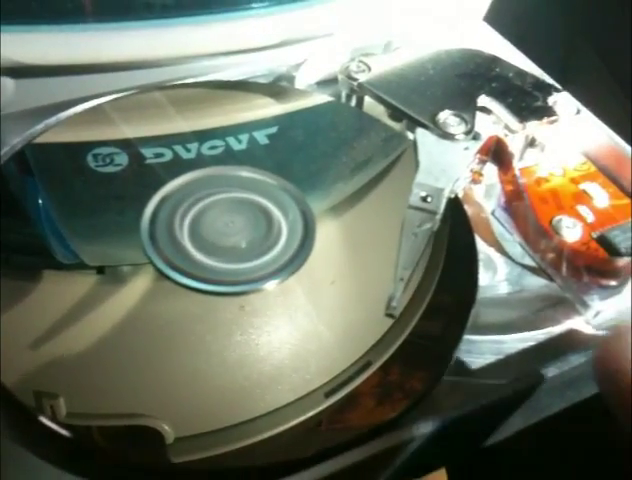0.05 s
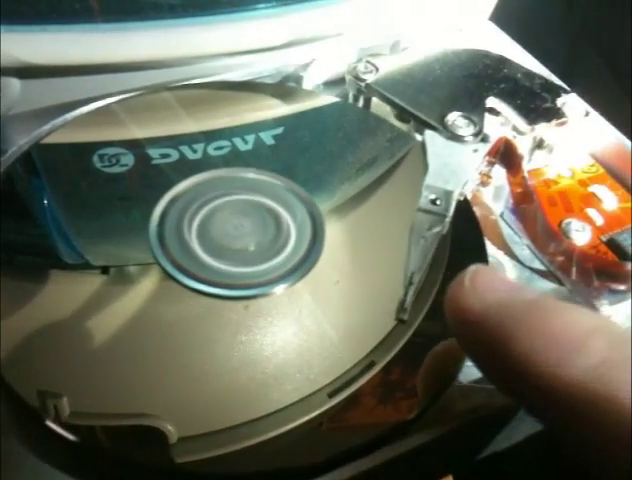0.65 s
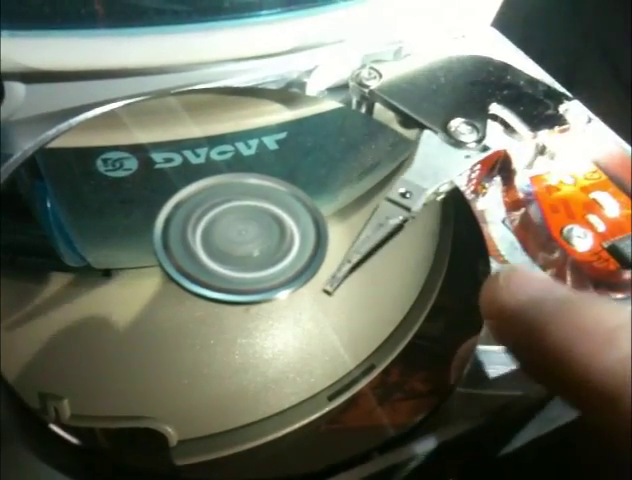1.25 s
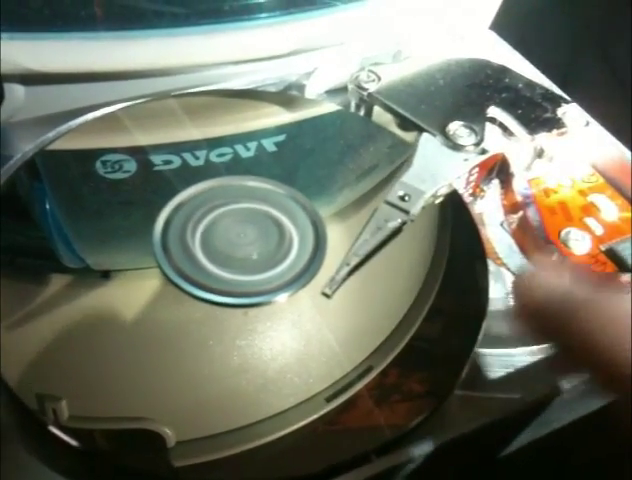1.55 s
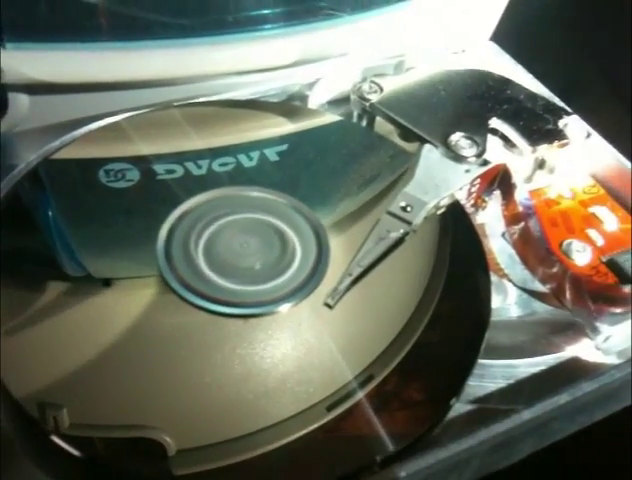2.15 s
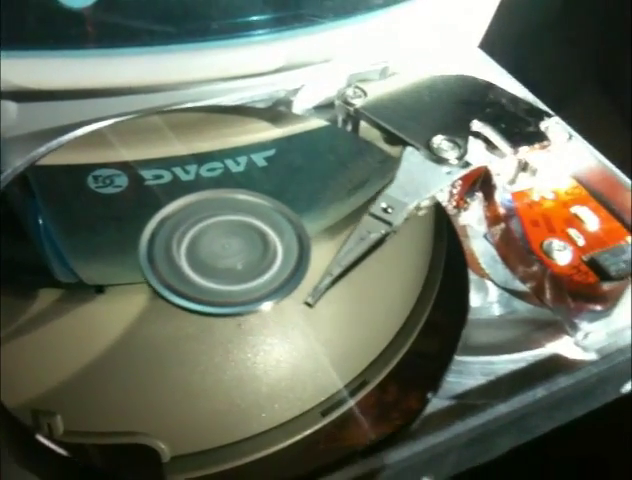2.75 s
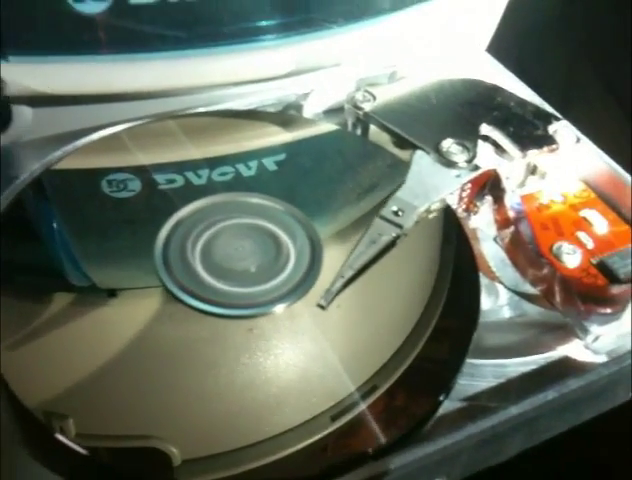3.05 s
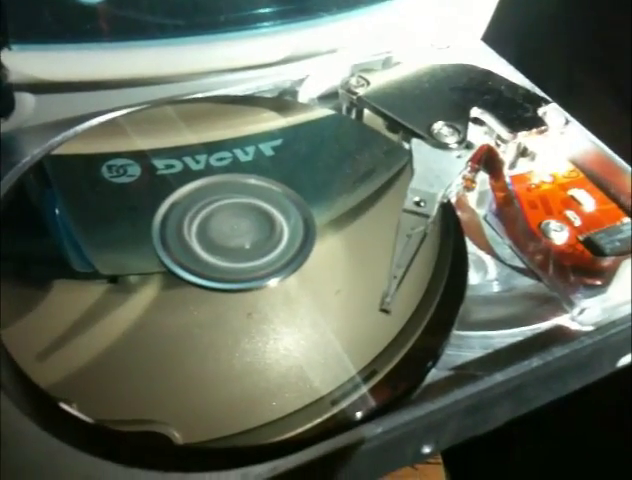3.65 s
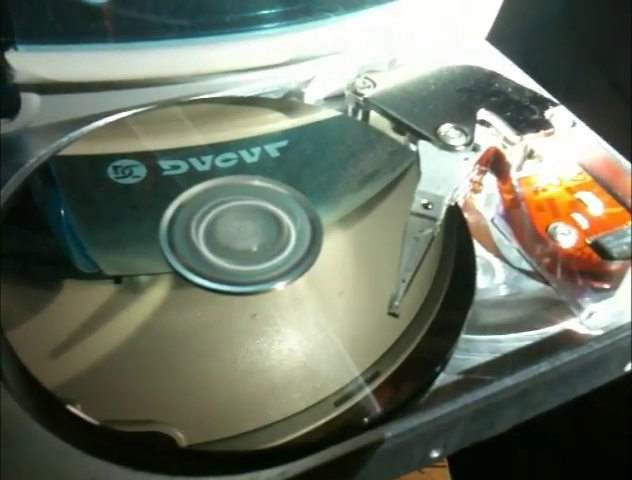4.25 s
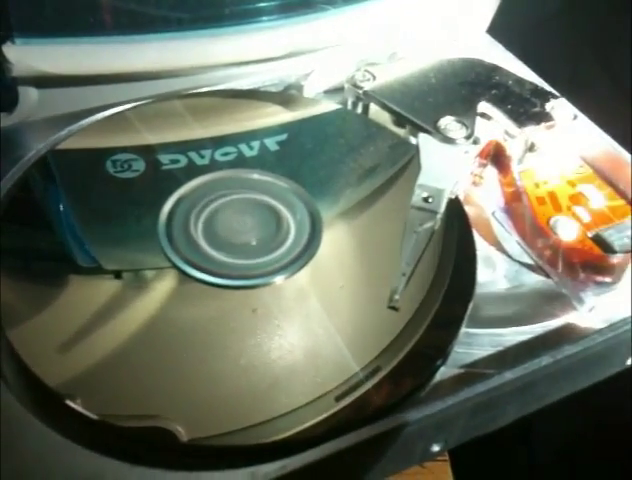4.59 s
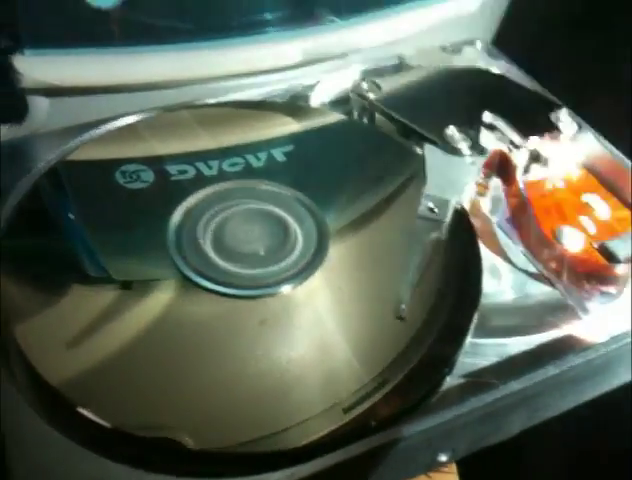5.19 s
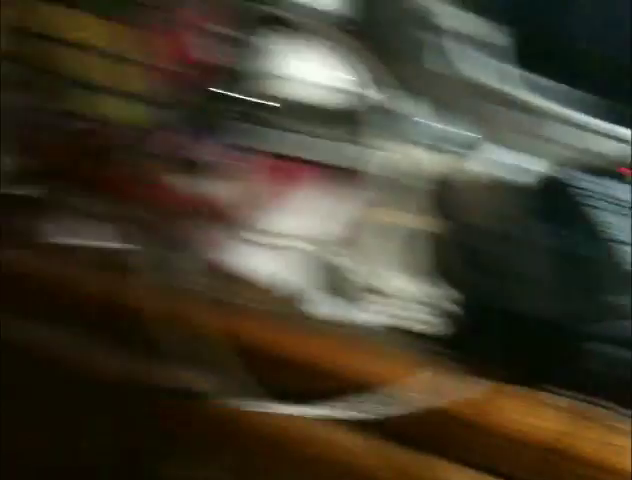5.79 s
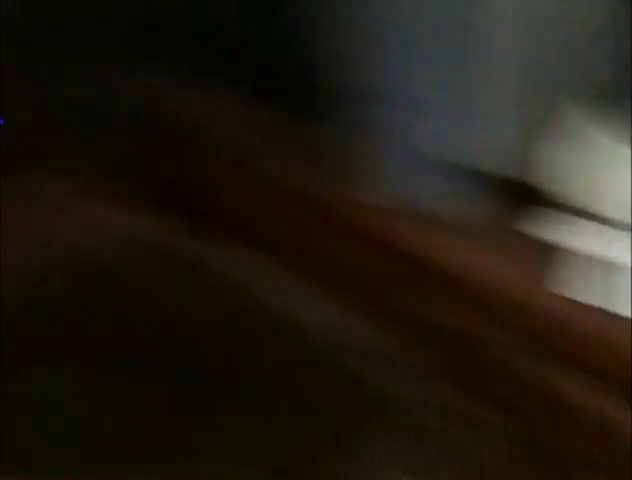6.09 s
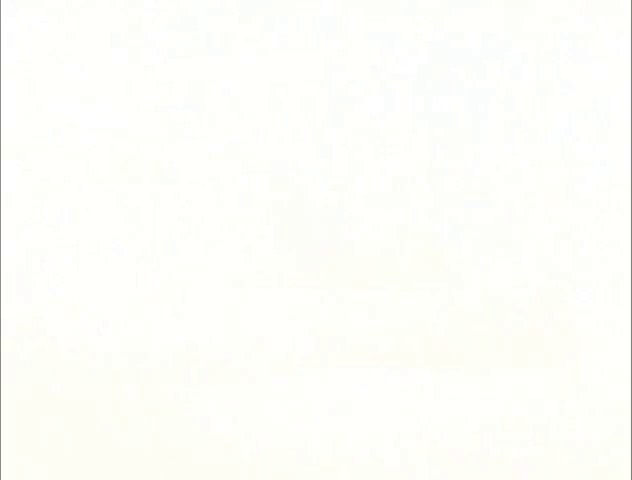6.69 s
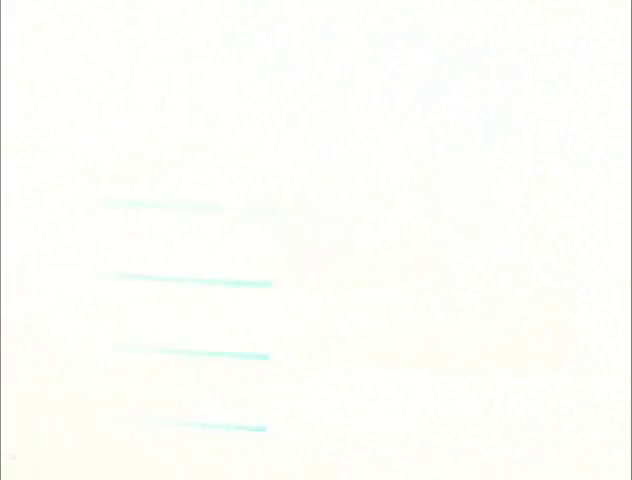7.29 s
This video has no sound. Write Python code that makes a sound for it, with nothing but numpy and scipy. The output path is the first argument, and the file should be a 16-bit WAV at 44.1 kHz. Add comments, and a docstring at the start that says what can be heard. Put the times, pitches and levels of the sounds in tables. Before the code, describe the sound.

In a furnished room with a low hum, a close hard drive gives off a high motor whine. Its arm clicks sharply and the head skids for an instant; the whine drops away twice, then steadies. A few more clicks follow, then soft uneven ticking. Near the end come light knocks and faint handling rubs as the microphone moves away and the drive grows quieter.

```python
"""A desk in a furnished room, microphone 14 cm from an open hard drive. A low hum sounds, a picture tube
whistles faintly, the motor whines and the bearings sing. From 0.8 s the speed hunts. At 1.2 s a finger
flicks the head arm against its stop and the head skids; the drive current then cuts out twice while the
bearings sing on. At 3.2 s the arm knocks back and goes on ticking. From about 5 s the hand rubs the
microphone and, over a few last knocks, carries it some 70 cm further off into the room's hum."""
import sys
import numpy as np
from scipy import signal
from scipy.fft import rfft, irfft, next_fast_len
from scipy.io import wavfile
from scipy.ndimage import uniform_filter1d, map_coordinates

SR = 44100
rng = np.random.default_rng(int(sys.argv[2]) if len(sys.argv) > 2 else 0)


def transcribe(signal):
    """Save signal, clipped to [-1, 1], as a 16-bit WAV file at the path in sys.argv[1]."""
    frames = np.atleast_2d(signal).T
    limited = np.clip(frames, -1, 1)
    pcm = np.round(limited * 32767).astype(np.int16)
    wavfile.write(sys.argv[1], SR, pcm)


N = 323249
TIME = np.arange(N) / SR


def amp(db):
    """Decibels to gain."""
    return 10 ** (np.asarray(db) / 20)


def unit(x):
    """Scale to rms 1."""
    return x / np.sqrt(np.mean(x ** 2) + 1e-20)


def curves(rows):
    """One value per sample for each column after the time."""
    times, *columns = np.transpose(rows)
    return [np.interp(TIME, times, column) for column in columns]


def wobble(rate_hz, size=64):
    """A smooth random curve, rate_hz knots a second, drawn in straight steps of size samples."""
    steps = np.arange(0, N + size, size)
    path = map_coordinates(rng.standard_normal(4096), [steps * rate_hz / SR], mode="wrap")
    return np.interp(np.arange(N), steps, path)


def coloured(x, spectrum):
    """x shaped by (frequency_hz, gain_db) points, at rms 1."""
    size = next_fast_len(N + 8192)
    hz, db = np.transpose(spectrum)
    gain = amp(np.interp(np.log(np.fft.rfftfreq(size, 1 / SR) + 1), np.log(hz), db))
    return unit(irfft(rfft(x, size) * gain, size)[:N])


def noise(spectrum):
    """Coloured noise of rms 1."""
    return coloured(rng.standard_normal(N), spectrum)


def tone(cycles, scatter=None, rate_hz=8):
    """A sine of rms about 1; a share of it, scatter, drifts in strength and phase."""
    angle = 2 * np.pi * (cycles % 1 + rng.random())
    if scatter is None:
        return np.sqrt(2) * np.sin(angle)
    steady = np.sqrt(2 * np.clip(1 - scatter ** 2, 0, 1))
    in_phase = steady + scatter * wobble(rate_hz)
    return in_phase * np.sin(angle) + scatter * wobble(rate_hz) * np.cos(angle)


def each_turn(turns, size=700):
    """A rough pattern that comes round again with every turn of the shaft."""
    return map_coordinates(rng.standard_normal(size), [turns % 1 * size], mode="grid-wrap")


def ringing(modes, t):
    """Struck modes dying away, at new strengths for every blow."""
    return sum(amp(db + rng.normal(0, 1.5) - 60 * t / t60) * np.sin(2 * np.pi * (hz * t + rng.random()))
               for hz, db, t60 in modes)


# Room rumble at the desk, the same away from it, and airy hiss: frequency_hz, density_db
DESK_RUMBLE = [(30, -38), (68, -32), (79, -29), (95, -38), (116, -6), (146, -9), (170, -3.5), (255, -0.5),
               (299, -0.5), (335, -8.5), (700, -10), (800, -13.5), (1200, -13), (1620, -18), (1900, -16),
               (2100, -21.5), (2500, -19), (3500, -61)]
FAR_RUMBLE = [(59, -49), (100, -20), (150, -6.5), (167, -3), (243, 0), (271, -8), (302, -0.5), (411, -11.5),
              (531, -7.5), (568, -10.5), (705, -10), (1460, -17.5), (2500, -21.5), (3250, -48),
              (5500, -120)]
AIR_HISS = [(1000, -2), (2500, 8.5), (5000, 8.5), (8500, 3), (10000, 3.5), (12000, -3), (13900, 3.5),
            (14700, -9)]
# Steady low hum tones near multiples of 59 Hz: pitch_hz, desk_level_db, far_level_db
LOW_HUM = [(58.7, -61.5, -64.5), (118.5, -63, -66), (178, -60, -58), (238, -72, -58.5), (300, -71.5, -55.5),
           (356.5, -72, -59), (906, -65, -69)]


def room_tone():
    """Rumble, hiss, hum and a picture tube's line whistle, heard at the desk, then away from it."""
    away, = curves([(5.4, 0), (6.2, 0.97)])

    def level(desk_db, far_db):
        return amp(desk_db + (far_db - desk_db) * away)

    rumble = np.sqrt(1 - away) * noise(DESK_RUMBLE) + np.sqrt(away) * noise(FAR_RUMBLE)
    hiss = level(-54, -55) * noise(AIR_HISS)
    hum = sum(level(desk_db, far_db) * tone(hz * TIME) for hz, desk_db, far_db in LOW_HUM)
    whistle = level(-58.5, -56.5) * tone(15734 * TIME, scatter=.45 + .3 * away, rate_hz=18)
    return level(-47.5, -46.5) * rumble + hiss + hum + whistle


SET_SPEED_HZ = 59.144
# The speed control overshoots, driving and coasting by turns: time_s, speed_error_hz
SPEED_HUNT = [(.84, 0), (.97, -.32), (1.44, 2.23), (2.252, -1.56), (2.705, .93), (2.975, -.38), (3.1, .07),
              (3.17, 0)]


def spindle():
    """Turns a second off the set speed, and the drive current (0-1), zero while the platter coasts."""
    switch_s, drag_hz_per_s, full_push_hz_per_s = .15, 4.4, 3.5
    error_hz = uniform_filter1d(curves(SPEED_HUNT)[0], round(switch_s * SR), mode="nearest")
    push = np.gradient(error_hz) * SR + drag_hz_per_s
    return error_hz, np.clip(push / full_push_hz_per_s, 0, 1)


# Base levels of the whine's three voices at the microphone: time_s, chord_db, middle_db, upper_db
WHINE_LEVELS = [(0.03, -39.5, -38.5, -46), (0.4, -39.5, -43.5, -41), (1.2, -39.5, -46, -47),
                (3.1, -39.5, -38.5, -46), (4, -40.5, -43, -47), (5.1, -39.5, -41, -55),
                (5.5, -41, -42.5, -36.5), (5.68, -41.5, -46, -46.5), (5.9, -38, -35.5, -35.5),
                (6.25, -40.5, -46, -44), (6.7, -45.5, -45.5, -53), (7.3, -49, -45, -43.5)]
# Resonances the voices cross as the speed changes: speed_error_hz, chord_db, middle_db, upper_db
WHINE_RESONANCES = [(-1.2, -9, -2, 7.5), (-0.93, -3, -7, 3), (-0.37, 5, 4.5, -5), (-0.19, 0.5, 6.5, 3),
                    (0.0069, 0, 0, -0.5), (0.23, -7.5, -5.5, -10), (0.69, 1.5, -6, -4), (1.3, -4, -10, -17),
                    (2.09, 0.5, -9, -6)]
# Close motor tones that beat once a turn: shaft_order, relative_db
CHORD = [(112, 0), (113, 0), (114, -16), (115, -9), (116, -12)]
# Weaker motor tones around them: shaft_order, base_level_db
SIDEBANDS = [(96, -60.6), (97, -71.1), (101, -64.1), (102, -65.3), (103, -53.5), (104, -59.0), (108, -68.7),
             (109, -67.3), (110, -62.7), (111, -61.8), (117, -65.0), (118, -62.6), (119, -67.5),
             (120, -61.6), (122, -63.8), (123, -59.3), (125, -64.1), (126, -69.4), (127, -69.4),
             (129, -61.6), (136, -66.4), (144, -68.3), (146, -70.3), (147, -65.0), (148, -71.3),
             (152, -70.7)]


def motor(turns, error_hz, current, retreat_m):
    """Switched coil current rings the motor at whole multiples of the shaft speed."""
    chord_db, middle_db, upper_db = curves(WHINE_LEVELS)
    errors, *gains = np.transpose(WHINE_RESONANCES)
    chord_boost, middle_boost, upper_boost = [np.interp(error_hz, errors, db) for db in gains]
    distance_db = -12 * retreat_m
    low_gain = amp(distance_db - 3 * np.abs(error_hz))  # low sidebands fade off the set speed
    high_gain = amp(distance_db + 0.98 * np.maximum(upper_boost, 0))
    # each tone flutters once the microphone moves through the room's standing waves
    flutter, = curves([(5.2, 0.079), (5.7, 0.68)])

    def partial(order, depth=1):
        return tone(order * turns, depth * flutter, rate_hz=15)

    def hub_db(order):  # overspeed carries a tone into the hub's resonance
        return 11 / (1 + ((order * (SET_SPEED_HZ + error_hz) - 7080) / 70) ** 2)

    chord = unit(sum(amp(db + hub_db(order)) * partial(order, depth=0.74) for order, db in CHORD))
    whine = amp(chord_db + chord_boost) * chord
    whine += amp(middle_db + middle_boost) * partial(124)
    whine += amp(upper_db + upper_boost) * partial(128)
    sidebands = sum(amp(db) * (low_gain if order < CHORD[0][0] else high_gain) * partial(order)
                    for order, db in SIDEBANDS)
    # the switching edges add a faint buzz on all the orders around
    buzz_spectrum = [(4000, -65), (5500, -2), (9000, 4), (9400, -17), (12700, -10), (14000, -38)]
    buzz = amp(-57.5) * high_gain * coloured(each_turn(turns), buzz_spectrum)
    drive = np.maximum(current ** 1.24, amp(-30))  # a trace of whine stays while coasting
    return drive * (whine + sidebands + buzz) * (1 + 0.098 * wobble(260))


# Ball-bearing tones at the set speed: pitch_hz, relative_db
BALL_TONES = [(2724, -52), (2826, -63), (2885, -62), (2968, -50), (3010, -59), (3078, -62), (3140, -54),
              (3213, -58), (3253, -63), (3465, -67), (3666, -68), (4258, -63), (4334, -61), (4398, -67),
              (4910, -68), (5372, -68), (5487, -72)]
# How well the casting radiates them: frequency_hz, gain_db
RADIATION = [(2630, -26), (2720, 1), (2900, 3.5), (3150, 1.5), (3500, 6), (4150, -7.5), (4330, 4),
             (4600, -0.5), (5400, 6)]
# Rolling noise through the casting: frequency_hz, density_db
ROLLING_NOISE = [(1500, -35), (2600, -19), (2760, 2.5), (3050, 0.5), (3350, -4), (3800, -10.5),
                 (4150, -11.5), (4320, -8), (4550, -25), (4900, -8), (5400, -12.5), (6200, -8.5),
                 (6850, -2), (7400, -16), (8800, -23), (10000, -29)]


def bearings(turns, retreat_m, start_distance_m=.14):
    """Balls roll in their races: tones slide with the speed through fixed resonances, over noise."""
    shaft_time = turns / SET_SPEED_HZ
    singing = sum(amp(db) * tone(hz * shaft_time, scatter=0.35, rate_hz=12) for hz, db in BALL_TONES)
    rolling = noise(ROLLING_NOISE) * amp(0.76 * wobble(70))
    head_by_hub = (TIME > 1.19) & (TIME < 3.25)  # the whirr is louder while the head rides there
    level = amp(-46 + 1.4 * head_by_hub) * start_distance_m / (start_distance_m + retreat_m)
    return level * (amp(-1.45) * coloured(singing, RADIATION) + amp(-3) * rolling)


# Blows of the head arm: start_s, level_db, brightness_db, casting_db, rebound_db
KNOCKS = [(1.1615, -16, 4, -6, -11), (1.1814, -17, 3, -14, 1), (3.218, -23.5, -6, 2.5, -5),
          (3.2455, -20, -22, -6, 2), (3.3934, -21.5, -17, -5, 0), (5.221, -30, -10, -8, -8),
          (5.2814, -25, -8, -7, -5.5), (5.579, -32.5, -2, -4, -12), (5.86, -31, -8, -9, -10),
          (6.1404, -34, -2, -7, -8)]
# Modes of the arm and of the drive's casting: pitch_hz, relative_db, t60_s
ARM_MODES = [(2780, -11, 0.038), (2967, -5, 0.026), (3142, -3.5, 0.044), (3495, -11, 0.044),
             (4040, -10, 0.017), (4330, -33, .03), (5270, -17.5, 0.036)]
CASTING_MODES = [(1040, -15, 0.094), (1571, -19.5, 0.13), (1912, -25, .15), (2397, -18, 0.16)]
# The crack of a contact: frequency_hz, density_db
CRACK = [(1500, -33), (2300, -41), (2900, 1), (3900, 8), (5000, 0), (7000, -0.5), (9000, 2.5),
         (11500, -1.5), (15500, -12)]


def arm_knocks(rebound_s=.0053, crack_t60_s=.015):
    """Each blow of the arm rebounds twice; every contact cracks and rings arm and casting."""
    t = np.arange(SR // 4) / SR
    out, grit = np.zeros(N + SR), noise(CRACK)
    for start_s, db, bright_db, casting_db, rebound_db in KNOCKS:
        contact_s = 0.00013 * amp(-bright_db)  # duller blows stay in contact longer
        attack = 1 - np.exp(-t / contact_s)
        contacts = [(0, 0), (rebound_s, rebound_db), (1.7 * rebound_s, rebound_db - 5.5)]
        for delay_s, contact_db in contacts:
            start = round((start_s + delay_s) * SR)
            span = slice(start, start + len(t))
            ring = ringing(ARM_MODES, t) + amp(casting_db) * ringing(CASTING_MODES, t)
            crack = amp(bright_db - 60 * t / crack_t60_s) * grit[span]
            out[span] += amp(db + contact_db) * (amp(-4) * ring + amp(-6) * crack) * attack
    return out[:N]


def room_echo(x, t60_s=.25):
    """The short answer of a furnished room, reaching the microphone 5 ms after the direct sound."""
    t = np.arange(SR // 2) / SR
    tail = rng.standard_normal(len(t)) * amp(-60 * t / t60_s) * (t > .005)
    return signal.fftconvolve(x, tail / np.linalg.norm(tail))[:N]


# The head scraping on the platter: frequency_hz, density_db
SCRAPE = [(1500, -35), (2600, -22), (3500, 3), (4700, -8), (5800, -2.5), (7300, 5.5), (8000, -5), (8700, 6),
          (10500, -12), (12000, -12), (15000, -19)]


def head_skid(turns, start_s=1.185, rise_s=.004, fall_db_per_s=180):
    """After the flick the head scrapes round the platter and lifts off again."""
    age = np.maximum(TIME - start_s, 0)
    level = amp(-28.5 - fall_db_per_s * age + 1.5 * wobble(300)) * (1 - np.exp(-age / rise_s))
    return level * coloured(each_turn(turns) + .5 * rng.standard_normal(N), SCRAPE)


def arm_ticks(count=14, from_s=3.45, to_s=5.3, rise_s=0.0011):
    """The freed arm ticks softly at uneven times, heard mostly through the casting."""
    t = np.arange(SR // 4) / SR
    out = np.zeros(N + SR)
    attack = 1 - np.exp(-t / rise_s)
    for k, (late, strength) in enumerate(rng.random((count, 2))):
        start = round((from_s + (to_s - from_s) * (k + late) / count) * SR)
        ring = ringing(ARM_MODES, t) + amp(8) * ringing(CASTING_MODES[2:], t)
        out[start:start + len(t)] += amp(-44.25 + 5 * strength) * ring * attack
    return out[:N]


# Rubs of the hand, right on the microphone: middle_s, half_length_s, level_db
RUBS = [(5.55, 0.46, -57), (6.45, 0.082, -48), (7.075, .15, -52)]
# Friction heard through its case: frequency_hz, density_db
CASE_FRICTION = [(1200, -12), (2250, -1), (2410, 9), (2560, -4), (4000, -1.5), (6000, -4), (9000, -3.5),
                 (13500, -9), (15500, -21)]


def handling(edge_drop_db=11):
    """Skin slides unevenly on the microphone's case; each rub swells and fades."""
    strokes = sum(amp(db - edge_drop_db * ((TIME - middle_s) / half_s) ** 2)
                  for middle_s, half_s, db in RUBS)
    return strokes * amp(2 * wobble(48)) * noise(CASE_FRICTION)


# The microphone leans in, then moves back from its first position: time_s, retreat_m
MICROPHONE_PATH = [(4.6, 0), (5.3, -0.033), (5.95, 0.05), (6.4, 0.29), (6.85, .58), (7.33, 0.72)]


def scene():
    """The drive on its desk, heard from one hand-held microphone."""
    error_hz, current = spindle()
    speed_hz = SET_SPEED_HZ + error_hz
    retreat_m, = curves(MICROPHONE_PATH)
    # the growing path to the microphone, at 343 m/s, lowers the pitch a little
    turns = np.cumsum(speed_hz) / SR - speed_hz * retreat_m / 343
    arm = arm_knocks() + arm_ticks() + head_skid(turns)
    spinning = motor(turns, error_hz, current, retreat_m) + bearings(turns, retreat_m)
    return (spinning + arm + amp(-21) * room_echo(arm) + room_tone() + handling())[None]


def record(dry, top_hz=15850):
    """The microphone's channel passes nothing above its band limit."""
    size = next_fast_len(N + 8192)
    passband = np.fft.rfftfreq(size, 1 / SR) < top_hz
    return irfft(rfft(dry, size) * passband, size)[..., :N]


dry = scene()
out = record(dry)
transcribe(out)
```